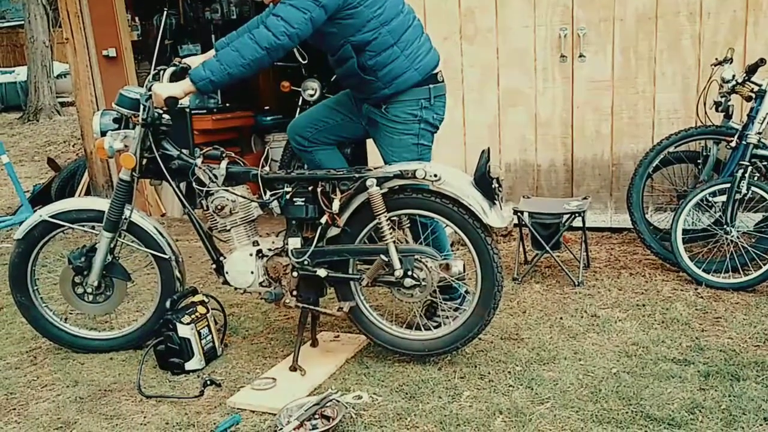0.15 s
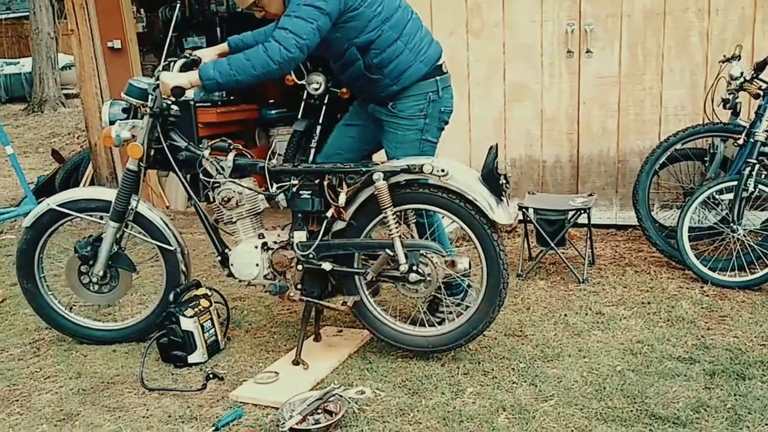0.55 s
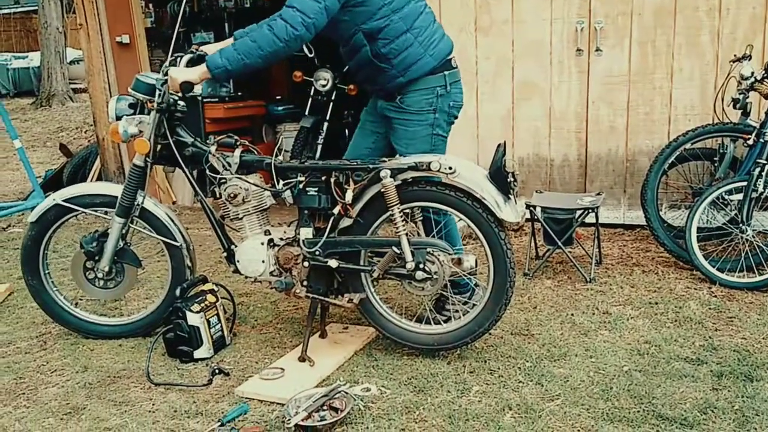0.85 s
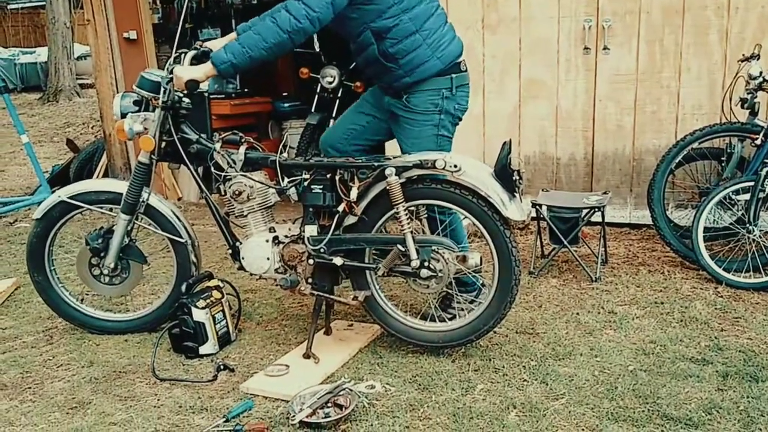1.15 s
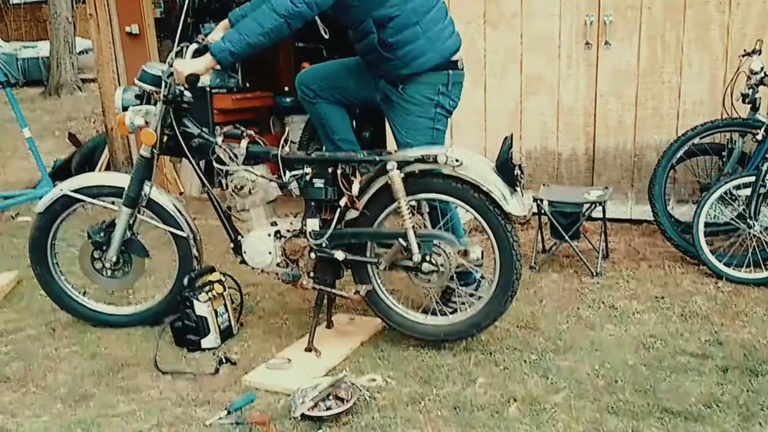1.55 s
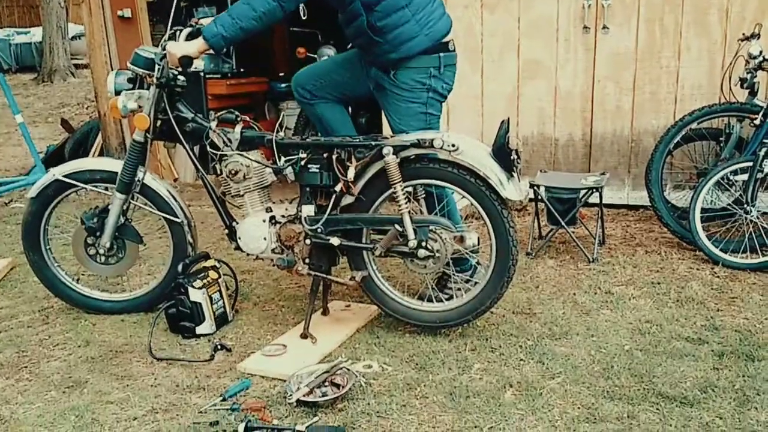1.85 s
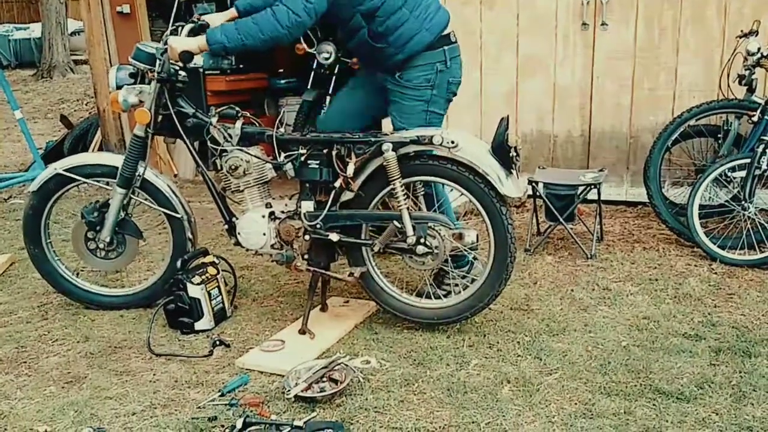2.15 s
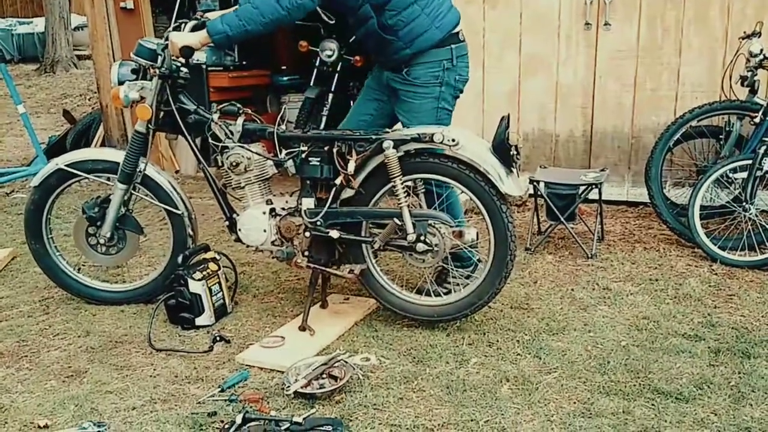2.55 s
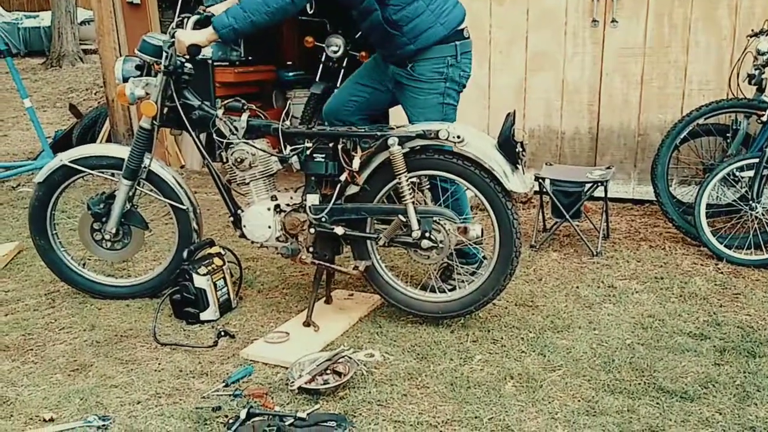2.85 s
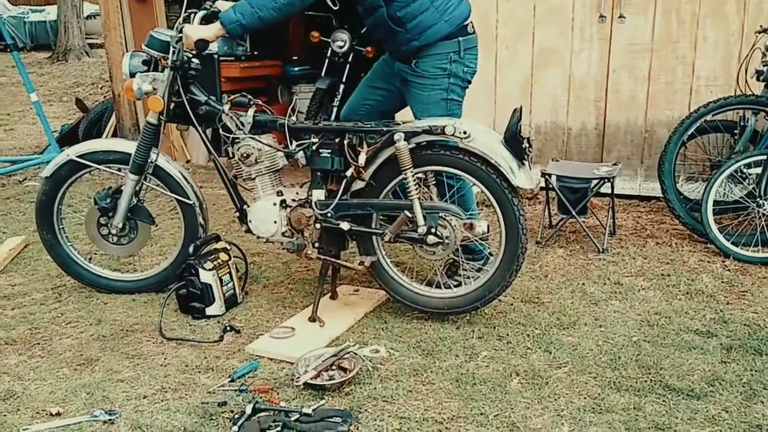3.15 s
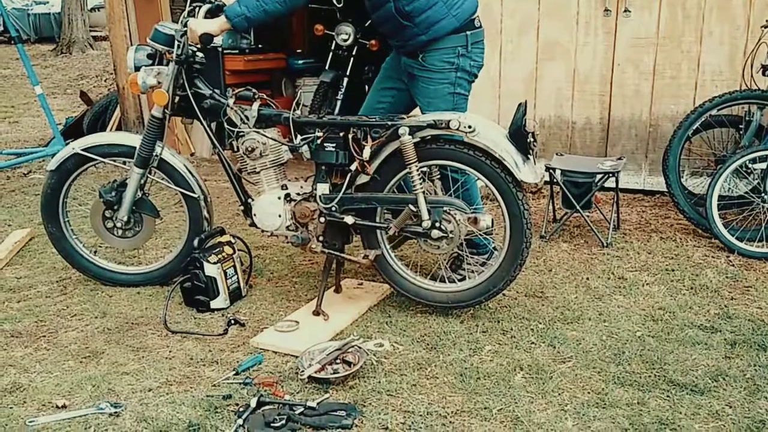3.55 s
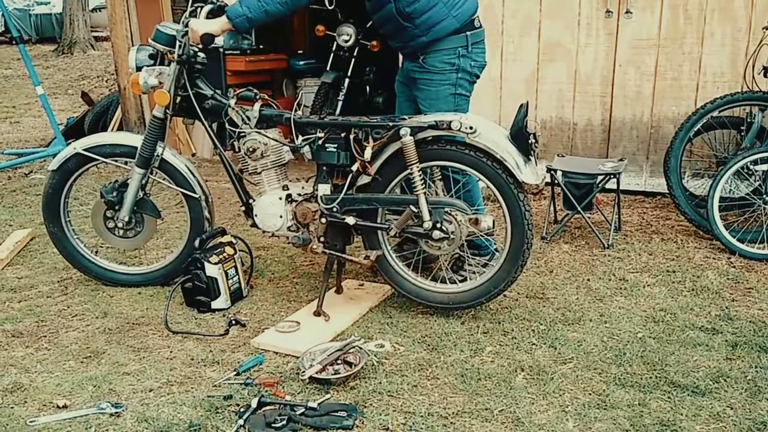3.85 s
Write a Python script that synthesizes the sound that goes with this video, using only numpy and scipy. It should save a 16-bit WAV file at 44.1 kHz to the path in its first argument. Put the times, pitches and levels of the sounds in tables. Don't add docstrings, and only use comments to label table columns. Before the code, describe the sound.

A small motorcycle is kick-started on a lawn by a wooden shed: one failed kick with whirring gears and rattling lever, then a second kick catches, stumbles and runs fast; close stereo microphone, faint traffic.

```python
import sys
import numpy as np
from scipy import signal
from scipy.fft import rfft, irfft
from scipy.io import wavfile
from scipy.ndimage import uniform_filter1d

SR = 44100
rng = np.random.default_rng(int(sys.argv[2]) if len(sys.argv) > 2 else 0)


def rack_gain(trim_db):
    fader = np.asarray(trim_db, float)
    return 10 ** (fader / 20)


def to_wav(sig):
    pcm = np.clip(np.atleast_2d(sig), -1, 1) * 32767
    pcm = np.round(pcm).astype(np.int16)
    wavfile.write(sys.argv[1], SR, pcm.T)


N = 176400
T = np.arange(N) / SR
TAIL = int(.4 * SR)

# frequency_hz, level_db
TRAFFIC_COLOUR = [(15, -36.5), (25, -13), (87, 1), (285, -18.5), (416, -31), (560, -50.5), (1100, -54),
                  (2500, -59.5), (16000, -68)]
# frequency_hz, side_minus_mid_db
SIDE_DB = [(100, -6), (700, -17), (1300, -13.5), (2400, -7.5), (4400, 0.5), (15000, 0.5)]
# start_s, length_s, pitch_hz, level_db
BIRD = [
    (0.2, 0.034, 1900, -75),
    (0.27, 0.07, 1945, -73),
    (.21, .07, 2700, -88),
    (0.575, 0.034, 1945, -84),
    (2.155, .055, 1950, -84),
    (2.16, .04, 2600, -87),
    (2.22, .055, 1800, -82),
    (2.205, .03, 820, -76),
]
# time_s, level_db
KICK_SPIN = [
    (.63, -78),
    (.705, -54.5),
    (.76, -33.5),
    (.93, -39),
    (1.06, -51),
    (1.22, -68.5),
    (1.5, -86),
]
# time_s, level_db
RUN_SPIN = [
    (2.284, -66),
    (2.329, -41.5),
    (2.49, -29),
    (2.55, -26.5),
    (2.95, -27.5),
    (3.04, -32.5),
    (3.21, -33.5),
    (3.297, -25.5),
    (4.0, -27.5),
]
# frequency_hz, density_db
GEAR_COLOUR = [(240, -11.5), (400, 0), (676, -13.5), (1840, -3.5), (2180, -1), (6740, -3.5), (11400, -8.5),
               (15000, -11), (16000, -17)]
# start_s, pitch_hz
RINGS = [(.81, 14000), (2.43, 13500), (1.18, 3600), (1.73, 1480), (1.79, 2800), (.645, 3300), (.668, 920),
         (1.194, 2880), (1.295, 2500), (1.296, 3530), (1.335, 2000), (1.385, 1230), (1.438, 1250),
         (1.478, 1180), (1.076, 9370), (1.79, 530)]
# level_db, t60_s
RING_SIZE = [(-22.5, 0.21), (-38, .1), (-60.5, 0.25), (-61, 0.35), (-54, 0.1), (-67.5, .1), (-55, 0.31),
             (-50, 0.065), (-64.5, 0.11), (-66, .08), (-67, .2), (-68, .12), (-69, .08), (-63, .08),
             (-46, 0.063), (-58.5, 0.17)]
# start_s, peak_db, centre_hz
TICKS = [(.698, -38, 11000), (.761, -10, 11000), (.771, -11, 9600), (.772, -10.5, 2000),
         (.853, -12.5, 11800), (.968, -37, 10600), (1.027, -19, 9000), (1.075, -24.5, 9500),
         (1.123, -43, 9800), (1.193, -41, 9300), (1.329, -57, 13140), (2.392, -7, 2320), (2.398, -4, 1700),
         (2.4965, -18, 10900), (2.526, -3, 11200), (2.5925, -16, 11100), (2.698, -5.5, 10600),
         (2.714, -7, 11200), (2.756, -2.5, 8500), (2.865, 2.5, 11000), (2.919, -9, 11100),
         (2.936, -6, 11300), (2.999, -5, 11100), (3.0715, -5, 11200), (3.156, -12, 10700),
         (3.21, -34, 9200), (3.289, 2, 11000), (3.333, 0, 9970), (3.372, -0.5, 9100), (3.408, 2, 11500),
         (3.706, -0.5, 11500), (3.88, -10, 10700)]
# start_s, peak_db, ring_hz, rattle_over_ring_db
KNOCKS = [(0.718, -25.5, 1910, 4), (0.761, -19, 3540, 7), (0.77, -16, 1420, 7), (0.807, -34, 1390, -2),
          (0.856, -27.5, 1270, 6.5), (0.981, -26, 940, 7), (1.025, -29, 915, -15), (1.075, -36, 1010, -21),
          (1.114, -26.5, 1297, -7.5), (1.194, -48, 2790, -0.5), (1.294, -46.5, 1380, -5.5),
          (1.339, -65, 2040, -3), (1.388, -66.5, 1200, -11.5), (1.515, -40, 1270, 2.5),
          (1.548, -34, 3490, 5.5), (1.727, -37.5, 3060, -9.5), (1.783, -34, 1050, -9),
          (2.298, -27.5, 2950, -1.5), (2.358, -23, 1075, 10), (2.391, -23.5, 1310, 13),
          (2.441, -19.5, 4400, 2), (2.599, -11.5, 1140, -10), (2.614, -15.5, 1350, -10),
          (2.627, -21, 1430, -14)]
# frequency_hz, density_db
KNOCK_COLOUR = [(240, -6), (400, -9), (753, -18), (1380, 1.5), (1580, -12.5), (2050, -6.5), (3690, -9),
                (13900, -9.5), (16000, -18.5)]
# start_s, thump_db, bark_db, ping_db, valve_db
STUMBLE = [(0.735, -23.5, -40.5, -33, -28.5), (0.829, -20.5, -41, -32, -26), (0.94, -22, -42.5, -35, -35),
           (1.16, -38, -51.5, -58, -64), (1.233, -38, -64, -76, -79), (2.327, -22, -39, -39, -28.5),
           (2.418, -25.5, -39, -32, -19.5), (2.51, -15.5, -26, -22.5, -15), (2.575, -26, -45, -25, -18),
           (2.642, -17, -23, -26, -14.5), (2.695, -29, -28, -31, -15.5), (2.755, -20.5, -23, -29, -14),
           (2.809, -26, -33, -25.5, -13.5), (2.862, -19, -23.5, -28, -16), (2.919, -18, -33, -31, -16.5),
           (2.982, -18, -34.5, -28, -16.5), (3.051, -19, -37.5, -30, -22), (3.133, -19, -38, -51, -24.5),
           (3.228, -17, -24.5, -24, -13)]
# start_s, thump_db, bark_db, ping_db
RUNNING = [(3.288, -16, -25, -27), (3.335, -19.5, -27, -24), (3.371, -21.5, -26, -19.5),
           (3.409, -22.5, -27, -24), (3.44, -26, -27, -30), (3.474, -17, -32, -52), (3.514, -19, -42, -43),
           (3.541, -15, -35, -33), (3.581, -27, -28.5, -35), (3.624, -16, -32, -26),
           (3.662, -17, -25.5, -34), (3.703, -19.5, -26, -20), (3.742, -19.5, -23.5, -20.5),
           (3.777, -20, -26, -28), (3.811, -21.5, -26, -24), (3.847, -25, -33, -27.5),
           (3.881, -19.5, -34, -30), (3.917, -15, -32, -27), (3.958, -15.5, -31.5, -38),
           (3.993, -38, -36, -32)]
# time_s, factor
HEAT = [
    (3.29, 1.057),
    (3.36, 1.377),
    (3.455, 1.56),
    (3.47, 1.113),
    (3.62, 0.977),
    (3.68, 1.154),
    (3.74, 1.32),
    (3.81, 1.435),
    (3.88, 1.07),
]
# centre_hz, width_hz, level_db
THUMP = [(120.2, 28.1, 7), (159, 50, -14.5), (78.8, 7.5, -15.5)]
# centre_hz, width_hz, level_db
BARK = [(220.7, 48.4, 0.5), (285.5, 65.3, 1.5), (365, 48, -15.5)]
# centre_hz, width_hz, level_db
PING = [(1795, 170, 7.5), (1270, 250, -8.5), (2840, 300, -8.5)]
# share_of_gap, level_db, t60_s, fin_ring_db
VALVES = [
    (0.01, -2.5, 0.13, 3),
    (.28, -3.5, 0.12, 5),
    (.62, -10.5, .05, 6),
]
# frequency_hz, density_db
VALVE_COLOUR = [(530, -38.5), (900, -14), (1800, -3), (2000, -9.5), (2890, -1), (3990, -5.5), (12300, -7),
                (15500, -2.5)]
# centre_hz, width_hz, level_db
FINS = [(9320, 550, -2.5), (10480, 900, -3.5), (11300, 720, 0.5)]
# centre_hz, width_hz, level_db
IDLE_FIN = (10000, 260, -1.5)


def shape(x, points):
    hz, db = np.array(points, float).T
    f = np.maximum(np.arange(N // 2 + 1) * SR / N, 1)
    return irfft(rfft(x) * rack_gain(np.interp(np.log(f), np.log(hz), db)), N)


def noise(points):
    mid, side = shape(rng.standard_normal((2, N)), points)
    side = shape(side, SIDE_DB)
    return np.array([mid + side, mid - side]) / np.std(mid)


def walk(rate):
    k = int(SR / rate)
    steps = np.repeat(rng.standard_normal(N // k + 1), k)
    return 1.305 * uniform_filter1d(uniform_filter1d(steps, k), k)[:N]


def ring(x, hz, width):
    return signal.lfilter(*signal.iirpeak(hz, hz / width, SR), x)


def pipe(x, modes):
    return sum(rack_gain(db) * SR / w * ring(ring(x, hz, w), hz, w) for hz, w, db in modes) / 2


def blow(db):
    return np.r_[rack_gain(db), np.zeros(TAIL - 1)]


def kicks(times, dbs):
    x = np.zeros(N)
    np.add.at(x, np.clip((times * SR).astype(int), 0, N - 1), rack_gain(dbs))
    return x


def fade(x, t60, rise=.001):
    p = np.exp(-np.log(1000) / (t60 * SR))
    q = np.exp(-1 / (rise * SR))
    return signal.lfilter([1 - q], [1, -q], signal.lfilter([1], [1, -p], x))


def clumpy(x):
    bands_hz = 1400 * 2 ** np.arange(0, 3.1, .5)
    return x + sum((rack_gain(3.5 * walk(45) - 1.5) - 1) * ring(x, hz, hz / 4) for hz in bands_hz)


def add(out, s, x):
    i = int(s * SR)
    out[..., i:i + x.shape[-1]] += x[..., :N - i]


def yard():
    level_db, rise_db_per_s, pan_db = -48, 0.5, -6.5
    swell = rack_gain(level_db + rise_db_per_s * (T - 2) + 1.1 * walk(9) + 1.3 * walk(42))
    song = bird()
    return noise(TRAFFIC_COLOUR) * swell * rack_gain(np.array([[pan_db], [-pan_db]]) / 2) + song


def bird():
    warble = 2.3 * walk(60)
    out = np.zeros(N)
    for s, length, hz, db in BIRD:
        envelope = np.clip(1 - (2 * (T - s) / length - 1) ** 4, 0, 1)
        out += rack_gain(db) * envelope * np.sin(2 * np.pi * hz * T + warble)
    return out


def spin_db(t):
    curves = [np.array(c, float).T for c in (KICK_SPIN, RUN_SPIN)]
    return np.maximum(*[np.interp(t, *c, left=-120, right=-120) for c in curves])


def gears():
    level_db = -4
    mesh = rack_gain(spin_db(T) + level_db + 2.54 * walk(300) + 3.3 * walk(40)) * noise(GEAR_COLOUR)
    return mesh + 3.27 * ring(mesh, 910, 90) + 1.2 * ring(mesh, 1200, 150)


def thin_rings():
    out, wobble = np.zeros((2, N)), 0.55 * walk(240)
    for (s, hz), (db, t60) in zip(RINGS, RING_SIZE):
        tone = np.sin(2 * np.pi * hz * T[:TAIL] + wobble[int(s * SR):][:TAIL])
        add(out, s, fade(blow(db), t60, rise=.003) * tone)
    return out


def ticks(white):
    level_db, t60_s, width_hz, length = -1.5, 0.017, 2900, 3000
    out = np.zeros((2, N))
    for k, (s, db, hz) in enumerate(TICKS):
        tick = fade(blow(db + level_db), t60_s, rise=.0007)[:length]
        add(out, s, ring(tick * white[:, k * length:(k + 1) * length], hz, width_hz))
    return out


def loose_parts():
    return clumpy(noise(KNOCK_COLOUR)) * rack_gain(2.5 * walk(400) + 1.1 * walk(60))


def knocks(rattle, white):
    level_db, ring_db, ring_t60_s, ring_width_hz = -8.5, -6, 0.17, 83
    rattle_t60_s, tail_db, tail_t60_s, soft_hz = 0.061, -14.5, 0.31, 10240
    band = signal.butter(2, [800, soft_hz], "band", fs=SR, output="sos")
    dull = signal.sosfilt(band, rattle)
    out = np.zeros((2, N))
    for s, db, hz, rattle_db in KNOCKS:
        hit, cut = blow(db + level_db), slice(int(s * SR), int(s * SR) + TAIL)
        loose = fade(hit, ring_t60_s) * white[:, cut]
        body = ring(loose, hz, ring_width_hz)
        body = body + 0.53 * ring(loose, min(hz * 2.3, 2800), 2 * ring_width_hz)
        shiver = fade(hit, rattle_t60_s, rise=.0007) + rack_gain(tail_db) * fade(hit, tail_t60_s, rise=0.012)
        texture = rattle if s < 1.25 or s > 2 else dull
        add(out, s, shiver * rack_gain(rattle_db) * texture[:, cut] + 7 * rack_gain(ring_db) * body)
    return out


def exhaust():
    thump_db, bark_db, ping_db, ping_t60_s, ping_rise_s = -9, 1.5, -6, 0.06, .002
    hot_damping, bark_heat_share, cold_end_share = 1.25, 0.17, 0.44
    click, pitch_spread = 17.2, .025
    strokes = np.r_[np.array(STUMBLE, float)[:, :4], np.array(RUNNING, float)]
    low, pings = np.zeros(N), np.zeros((2, N))
    gas = noise([(100, 0.017), (9000, 0.014)])
    tunes = 1 + pitch_spread * rng.standard_normal(len(strokes))
    for k, (s, thump, bark, ping) in enumerate(strokes):
        running = k >= len(STUMBLE)
        heat = np.interp(s, *np.array(HEAT).T) if running else 1
        damping = hot_damping if running else 1
        pulse = blow(thump + thump_db)
        add(low, s, -pipe(pulse, [(hz * heat, w * damping, db) for hz, w, db in THUMP]))
        add(low, s, -cold_end_share * min(4 * (heat - 1), 1) * pipe(pulse, THUMP[:1]))
        tailpipe = [(hz * heat ** bark_heat_share, w, db) for hz, w, db in BARK]
        add(low, s + .0023, pipe(blow(bark + bark_db)[:TAIL // 2], tailpipe))
        hit = blow(ping + ping_db)[:TAIL // 4]
        hiss = fade(hit, ping_t60_s, rise=ping_rise_s) * gas[:, k * 4000:][:, :len(hit)]
        puff = hiss + click * np.roll(hit, int(ping_rise_s * SR))
        add(pings, s, 8 * sum(rack_gain(db) * ring(puff, hz * tunes[k], w) for hz, w, db in PING))
    return pings + low, low


def valve_gear(low):
    level_db, scatter_db, longest_gap_s = -3.5, 1.5, .1
    run_db, puff_db, fins_pan_db = 13, 15, 3.5
    cold, hot = np.array(STUMBLE, float), np.array(RUNNING, float)
    s = np.r_[cold[:, 0], hot[:, 0]]
    loudness = np.r_[cold[:, 4], spin_db(hot[:, 0]) + run_db]
    gap = np.minimum(np.diff(s, append=s[-1] + .04), longest_gap_s)
    chance = rng.standard_normal((len(s), 2 * len(VALVES)))
    metal = clumpy(noise(VALVE_COLOUR)) * rack_gain(puff_db * low + 2.0 * walk(150))
    pan = np.array([[fins_pan_db], [-fins_pan_db]])
    out = np.zeros((2, N))
    for k, (share, db, t60, fin_db) in enumerate(VALVES):
        times = s + gap * (share + 0.015 * k * chance[:, 2 * k])
        scatter = scatter_db * min(k, 1) * chance[:, 2 * k + 1]
        clack = fade(kicks(times, loudness + db + level_db + scatter), t60, rise=.0007) * metal
        fins = sum(rack_gain(g) * ring(clack, hz, w) for hz, w, g in FINS)
        fins = fins + rack_gain(IDLE_FIN[2]) * ring(clack * (T < hot[0, 0]), *IDLE_FIN[:2])
        out = out + clack + rack_gain(fin_db + pan) * fins
    return out


def shed_slap(bike):
    delay_s, level_db = .011, -11.5
    return rack_gain(level_db) * np.roll(bike[::-1], int(delay_s * SR), axis=1) * (T > .1)


def scene():
    pulses, low = exhaust()
    engine = pulses + valve_gear(low)
    bike = engine + gears()
    rattle = loose_parts()
    white = noise([(100, 0.011), (9000, 0.014)])
    bike = bike + thin_rings() + ticks(white) + knocks(rattle, white)
    return bike + shed_slap(bike) + yard()


def roll_off(x):
    return signal.sosfilt(signal.butter(12, 16820, fs=SR, output="sos"), x)


def record(dry):
    top_hz = 15480
    rounded = np.tanh(1.232 * dry) / 1.223
    mix = signal.sosfilt(signal.ellip(10, .3, 80, top_hz, fs=SR, output="sos"), rounded)
    return roll_off(mix)


dry = scene()
out = record(dry)
to_wav(out)
```